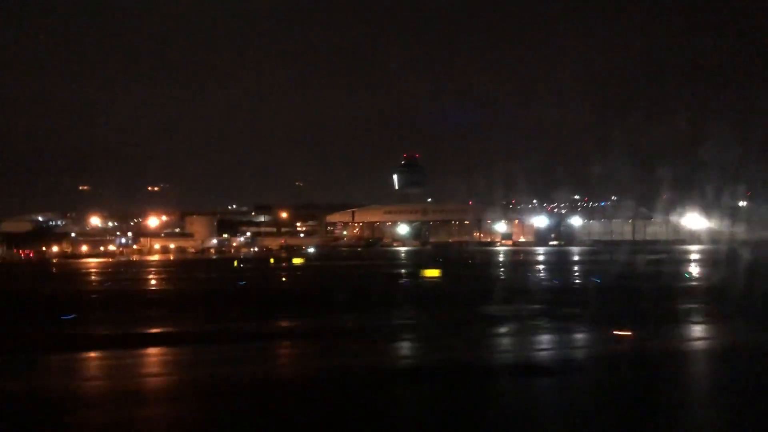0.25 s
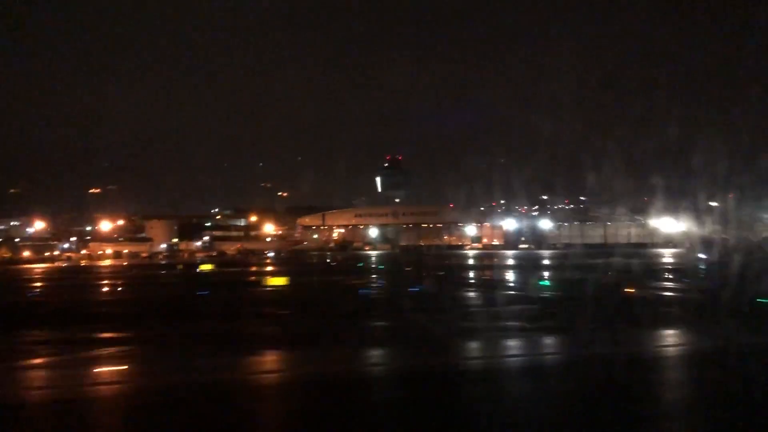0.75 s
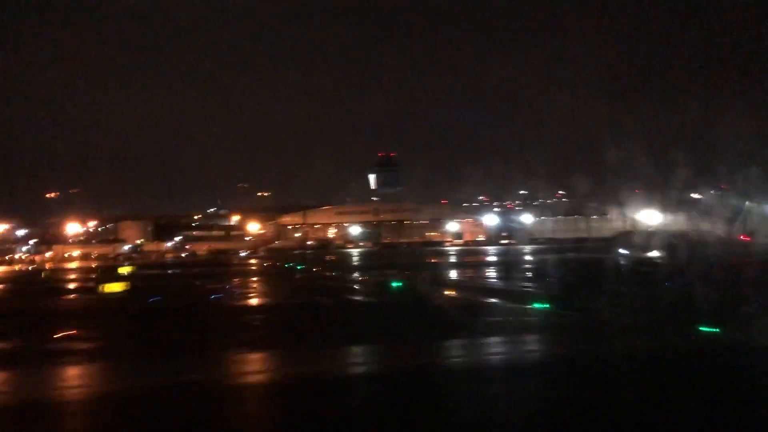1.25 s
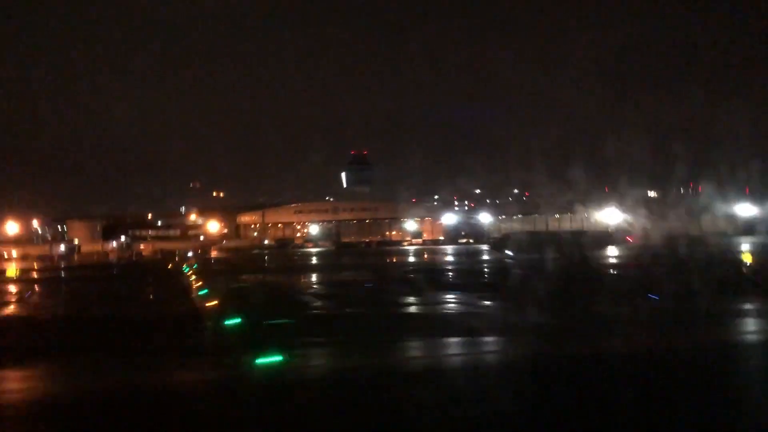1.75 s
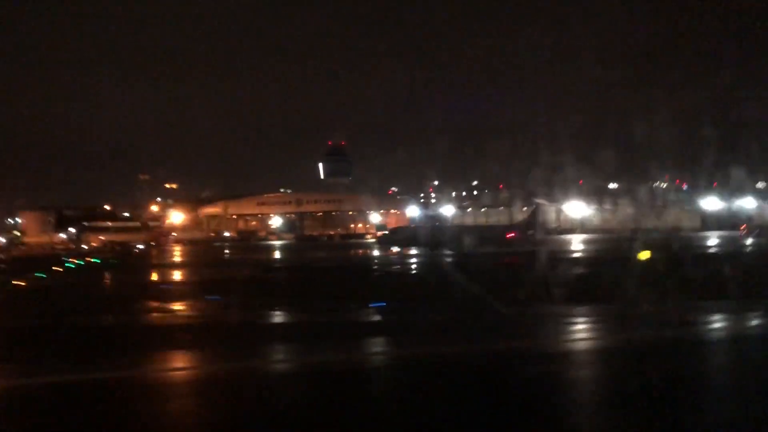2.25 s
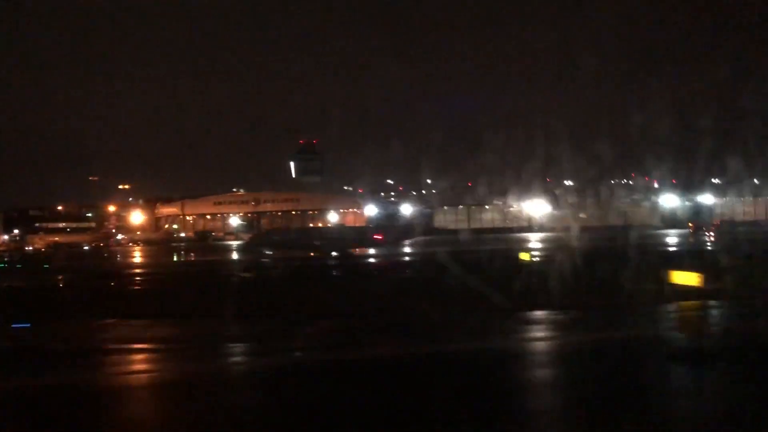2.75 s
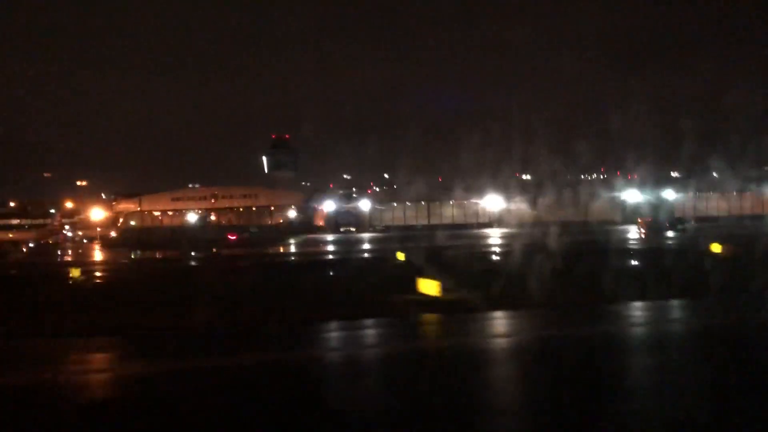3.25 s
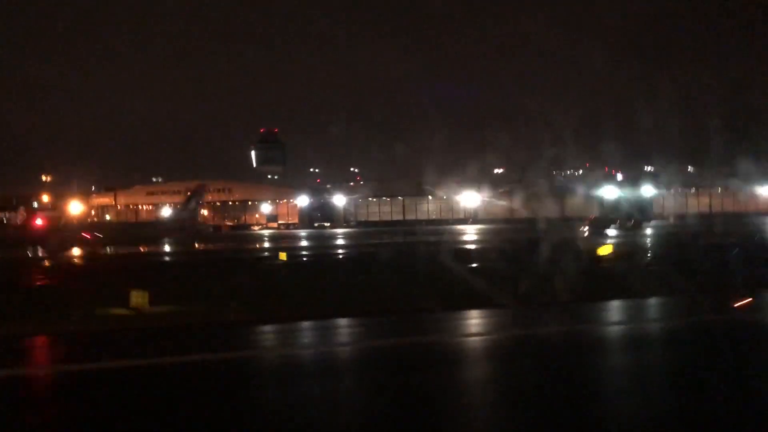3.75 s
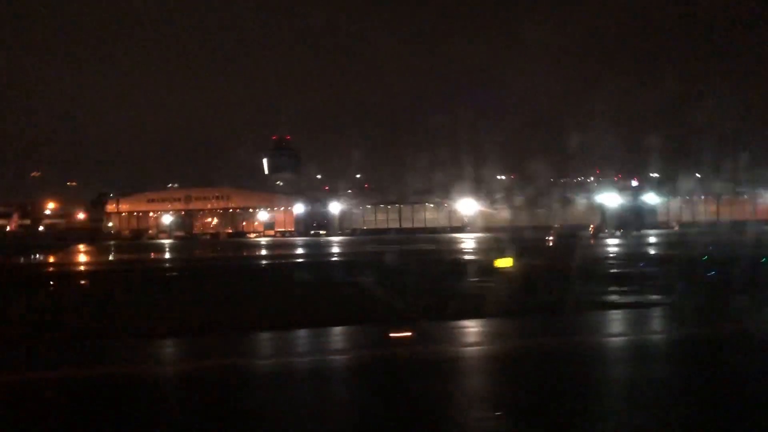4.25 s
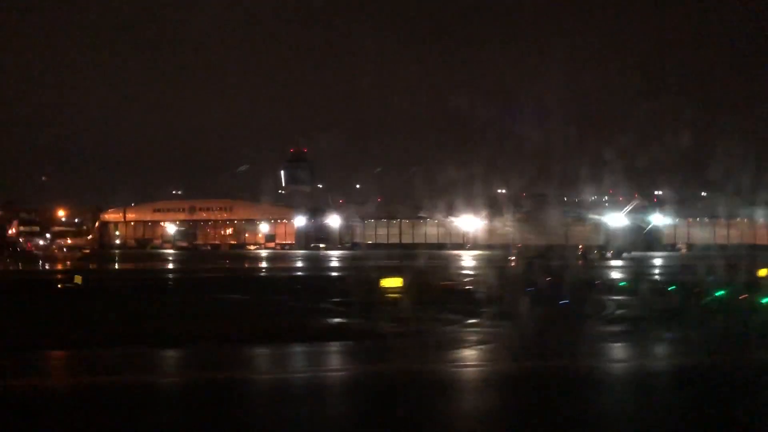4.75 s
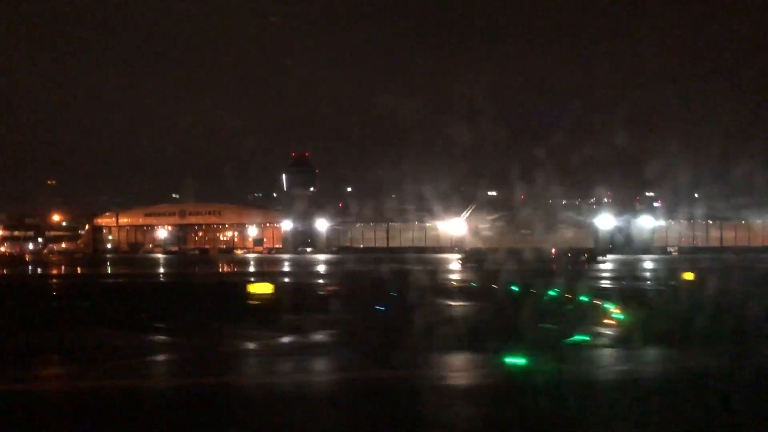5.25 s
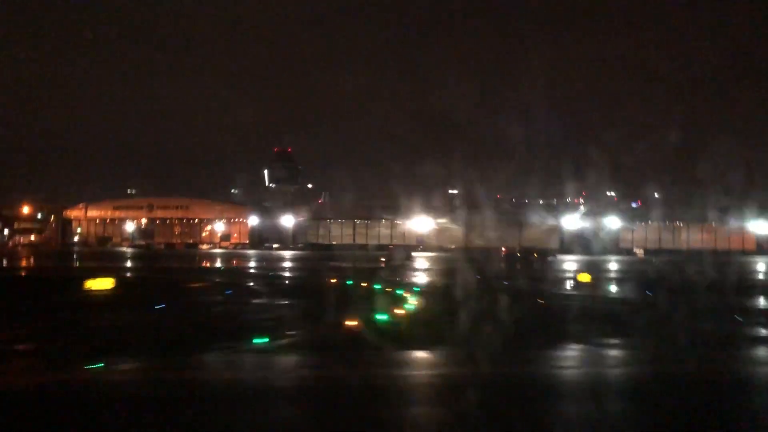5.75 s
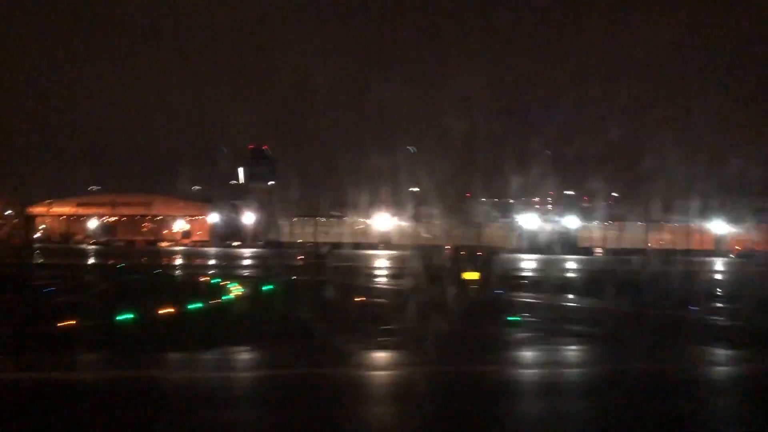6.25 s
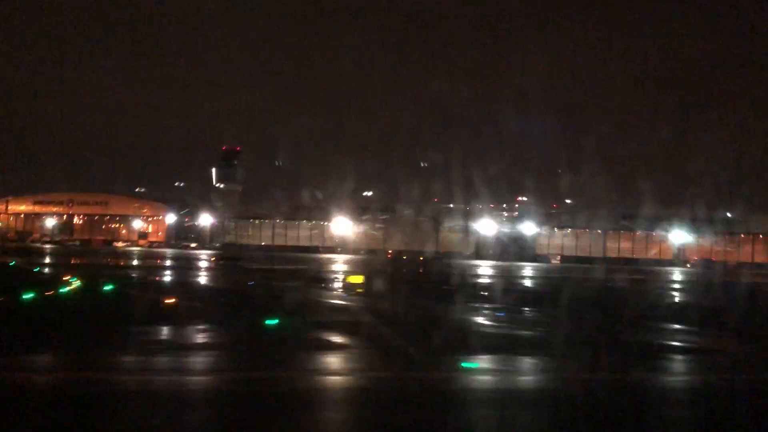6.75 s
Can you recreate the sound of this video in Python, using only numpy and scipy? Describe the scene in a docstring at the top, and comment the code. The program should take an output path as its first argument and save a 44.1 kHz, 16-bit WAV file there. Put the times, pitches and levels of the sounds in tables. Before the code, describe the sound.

Inside an airliner cabin slowing on a wet runway, reverse-thrust roar and deep wheel rumble fade while loose trim rattles and a runway joint thuds.

```python
"""Reverse-thrust roar and wheel rumble die away inside an airliner cabin on its landing roll, on a wet runway.
The fuselage booms unevenly, as a steadier drone around a runway joint, then unevenly again; the joint thuds.
Roar, rumble, panel shudder and air rush are coloured noise on level curves; engine hum and whines are
wavering sines. Loose trim rattles as gritty noise bursts; panel, latch and small parts are struck resonances."""
import sys
import numpy as np
from scipy import signal
from scipy.fft import rfft, irfft, next_fast_len
from scipy.io import wavfile
from scipy.ndimage import uniform_filter1d

SR = 44100
rng = np.random.default_rng(int(sys.argv[2]) if len(sys.argv) > 2 else 0)


def store_wav(level_fs):
    """Save 16-bit WAV to argv[1]."""
    pcm = np.round(np.clip(np.atleast_2d(level_fs), -1, 1) * 32767)
    wavfile.write(sys.argv[1], SR, pcm.T.astype(np.int16))


def magnitude_from_level(level_db):
    """Linear magnitude for a level in decibels (20 dB per decade)."""
    exponent = np.asarray(level_db, float) / 20
    return 10 ** exponent


N = 309141

BUMP_S = 3.2932      # runway joint
CLATTER_S = 0.1      # decay time constant of the shaking at the joint


def rms_one(x):
    """Scale to rms 1."""
    return x / np.sqrt(np.mean(x ** 2) + 1e-20)


def in_time(rows):
    """Columns of a table as curves over all samples."""
    s, *columns = np.transpose(rows)
    return [np.interp(np.arange(N) / SR, s, c) for c in columns]


def drift(corner_hz):
    """Slow chance, spread 1: noise at SR / 40 twice through a one-pole low-pass."""
    r = np.exp(-80 * np.pi * corner_hz / SR)
    noise = rng.standard_normal(N // 40 + 2002)
    slow = signal.lfilter([1], [1, -2 * r, r * r], noise)[2000:]      # settled part
    return np.interp(np.arange(N) / 40, np.arange(len(slow)), rms_one(slow - slow.mean()))


def coloured(spectrum):
    """Noise of rms 1 shaped by a spectrum, interpolated over log frequency."""
    size = next_fast_len(N)
    hz = np.maximum(np.arange(size // 2 + 1) * SR / size, 1)
    points = np.array(spectrum)
    db = np.interp(np.log(hz), np.log(points[:, 0]), points[:, 1], left=-90, right=-90)
    return rms_one(irfft(rfft(rng.standard_normal(size)) * magnitude_from_level(db), size)[:N])


def patchy(spectrum):
    """Coloured noise in third-octave strips; every sixth strip shares one of six independent flickers."""
    flicker_db = 2.2
    whole = rfft(coloured(spectrum))
    octave = np.log2(np.arange(1, N // 2 + 2) * SR / N)
    group = np.round(3 * octave).astype(int) % 6
    return sum(magnitude_from_level(flicker_db * drift(25.0)) * irfft(whole * (group == k), N) for k in range(6))


def ring(clicks, hz, t60_s):
    """Two-pole resonance: a unit click sets a sine of height 1 ringing."""
    r = magnitude_from_level(-60 / (t60_s * SR))
    w = 2 * np.pi * hz / SR
    return signal.lfilter([0, np.sin(w)], [1, -2 * r * np.cos(w), r * r], clicks + 1e-18)


def decaying(clicks, decay_s):
    """Every click becomes an exponential decay with this time constant."""
    return signal.lfilter([1], [1, -np.exp(-1 / (decay_s * SR))], clicks + 1e-18)


def click(s, db):
    """One impulse."""
    x = np.zeros(N)
    x[round(s * SR)] = magnitude_from_level(db)
    return x


def wavering(hz, db, waver_hz, corner_hz, flutter_db):
    """A sine on a pitch and level curve, both trembling."""
    phase = 2 * np.pi * np.cumsum(hz + waver_hz * drift(corner_hz)) / SR
    return np.sqrt(2) * magnitude_from_level(db + flutter_db * drift(corner_hz)) * np.sin(phase)


def ping(s, db, hz, t60_s):
    """A brief gritty push at the mode's pitch sets it ringing."""
    contact_s = 0.0023
    t = np.arange(SR // 50) / SR
    push = rng.exponential(1, len(t)) * np.exp(-t / contact_s)
    contact, i = np.zeros(N), round(s * SR)
    contact[i:i + len(t)] = 2 * magnitude_from_level(db) * push / push.sum() * np.cos(2 * np.pi * hz * t)
    return ring(contact, hz, t60_s)


def roar(roar_db):
    """Reverse-thrust roar: coloured noise, slightly unsteady."""
    # roar spectrum: hz, relative_db_per_hz
    roar_spectrum = [(100, -8.5), (200, 0.5), (300, -2), (450, -5.5), (624, -11.5), (775, -18),
                     (1040, -22.5), (1800, -46), (4000, -49)]
    return magnitude_from_level(roar_db + 0.9 * drift(7.8)) * coloured(roar_spectrum)


def wheels(rumble_db):
    """Wheel rumble through the floor: low coloured noise, slightly unsteady."""
    # rumble spectrum: hz, relative_db_per_hz
    rumble_spectrum = [(24, -34), (36, -22), (48, -7), (80, -4), (130, -3.5), (170, -5.5), (230, -14.5),
                       (400, -46)]
    return magnitude_from_level(rumble_db + 1.0 * drift(4.6)) * coloured(rumble_spectrum)


def boom():
    """Two randomly shaken low cabin modes beat; around the joint a drone prevails, then the beating returns."""
    # fuselage boom level: time_s, level_db
    boom_level = [(0, -34), (.47, -22.5), (.94, -24.5), (1.23, -17.5), (1.7, -23.5), (2.25, -18.5),
                  (2.45, -28), (2.89, -17.5), (3.05, -27.5), (3.12, -15.5), (3.26, -23), (3.31, -12.5),
                  (3.39, -14.5), (3.71, -12), (3.84, -20), (3.9, -16), (4.46, -18.5), (4.53, -21.5),
                  (4.62, -21), (6.3, -23), (7.01, -24)]
    width_hz, evenness = 9.7, 0.56
    drone_hz, sag_hz_per_s = 63.03, 1.74
    rise_s, end_s, fall_s = 0.45, 4.35, 0.4      # rises ahead of the joint, falls after end_s
    t = np.arange(N) / SR
    t60_s = np.log(1000) / (np.pi * width_hz)
    shaken = 0
    for mode_hz in (57.7, 67.94):
        mode = ring(ring(rng.standard_normal(N), mode_hz, t60_s), mode_hz, t60_s)
        swing = np.sqrt(uniform_filter1d(mode ** 2, size=2400))
        shaken = shaken + rms_one(mode / swing ** evenness) / np.sqrt(2)      # evens out the swings
    hz = drone_hz - sag_hz_per_s * np.clip(t - BUMP_S, 0, end_s - BUMP_S)
    phase = 2 * np.pi * np.cumsum(hz + 0.87 * drift(10.8)) / SR
    drone = np.sqrt(2) * np.sin(phase - phase[round(BUMP_S * SR)])      # phase zero at the joint
    rise = 1 + (t - BUMP_S) / rise_s
    fall = 1 - (t - end_s) / fall_s
    share = np.clip(np.minimum(rise, fall), 0.12, 0.93)      # drone's share of the power
    level = magnitude_from_level(in_time(boom_level)[0] + 1.27 * drift(7.0))
    return level * (np.sqrt(share) * drone + np.sqrt(1 - share) * shaken)


def thud():
    """The runway joint strikes a low resonance, then shortly after a higher one; both low-passed."""
    first = ring(click(BUMP_S, -7), 169, 0.049)
    second = ring(click(BUMP_S + 0.0165, -11.5), 266, 0.029)
    return signal.sosfilt(signal.butter(2, 900.0, fs=SR, output="sos"), first + second)


def hum():
    """Engine shaft hum: a sine wavering in pitch and level."""
    # shaft hum: time_s, pitch_hz, level_db
    hum_curve = [(0, 203.1, -36), (1.2, 200.7, -31), (2.4, 199.7, -35.5), (3.5, 207.1, -33.5),
                 (4.6, 199, -34), (4.75, 197.3, -29.5), (5.7, 192, -29.5), (6.2, 193, -36),
                 (7.01, 190.3, -41)]
    return wavering(*in_time(hum_curve), waver_hz=3.5, corner_hz=10.7, flutter_db=3.0)


def rattles():
    """Loose trim: bursts of gritty noise, one longer at the joint, fainter ones and tiny ticks at random."""
    # clearest trim rattles: start_s, treble_level_db, dull_part_relative_db
    rattle_rows = [(0.008, -37, -1), (0.07, -42, -4), (0.5894, -47, -6), (0.877, -46, -11),
                   (0.9094, -49, -9), (1.1035, -43, -9), (1.2994, -49, 6), (1.38, -45, -9), (1.853, -47, 5),
                   (2.677, -47, 2), (2.692, -49, 2), (2.824, -46, 8), (3.0458, -46, -1), (3.127, -50, 9),
                   (3.1542, -49, 9), (3.298, -47, -2), (3.318, -44, -4), (3.3754, -53, 1), (3.392, -59, -2),
                   (3.4755, -52, -13), (3.6836, -48, 8), (3.72, -50, 1), (4.2314, -45, -1),
                   (4.2734, -47.5, 9), (4.452, -46, 7), (4.4654, -52, 8), (4.812, -51, -6),
                   (4.9785, -48, -1), (5.4455, -47, -10), (5.7957, -47, -2), (5.9045, -49, 8),
                   (6.1739, -45, 2), (6.205, -51, 9), (6.4912, -45, 1), (6.6413, -49, -8),
                   (6.792, -47.5, -4), (6.9347, -46, 9.5)]
    decay_s, faint_per_s = 0.011, 3.0
    grit = magnitude_from_level(1.5 * np.minimum(rng.exponential(1, N // 30 + 1), 4)).repeat(30)[:N]
    bright = rms_one(grit * patchy([(4500, -9), (7000, 2.0), (11000, -5.0), (16000, -7)]))
    dull = rms_one(grit * patchy([(550, -6), (800, -1), (1500, 8.0), (1900, 2), (2280, 7.5),
                                  (2900, -0.5), (4200, 5.5), (6500, -12)]))
    bursts = [(*row, decay_s) for row in rattle_rows]
    bursts.append((BUMP_S, -44, 2, CLATTER_S))
    faint_s = np.flatnonzero(rng.random(N // 100) < faint_per_s * 100 / SR) * 100 / SR
    for s in faint_s:
        a, b = rng.standard_normal(2)
        bursts.append((s, -56 + a, -7 + 4.0 * b, decay_s))
    out = np.zeros(N)
    for s, db, dull_db, length_s in bursts:
        i = round(s * SR)
        t = np.arange(min(N - i, SR // 3)) / SR / length_s
        shape = magnitude_from_level(db) * (1 - np.exp(-t * 3.2)) * np.exp(-t)
        out[i:i + len(t)] += shape * (bright[i:i + len(t)] + magnitude_from_level(dull_db) * dull[i:i + len(t)])
    born = rng.random(N) < 25.0 / SR      # 25 ticks a second on average
    ticks = decaying(born * magnitude_from_level(-57.5 + 3.7 * rng.standard_normal(N)), 0.0025)
    return out + ticks * (bright + dull)


def panel():
    """Knocks scuffle on a hollow panel, favouring modes near the struck spot's pitch; the joint scuffles longer."""
    # hollow panel knocks: start_s, strength_db, favoured_pitch_hz
    knock_rows = [(3.305, -48, 1320), (3.316, -44, 1500), (3.345, -42, 890), (3.377, -46, 2230),
                  (3.43, -42, 950), (3.69, -42, 1320), (4.214, -48, 1150), (4.274, -38.5, 1083),
                  (4.305, -44, 1200), (4.328, -38, 1200), (5.479, -44, 1100), (5.867, -46, 1320),
                  (6.111, -41.5, 1250), (6.488, -43.5, 1320)]
    # panel modes: pitch_hz, level_db, t60_s
    panel_modes = [(750, -8, 0.031), (890, -12, 0.022), (1078, -12, 0.027), (1320, -10, 0.021),
                   (1560, -14, 0.018), (2230, -18.5, .018), (2700, -29, 0.018)]
    faint_per_s, off_spot_db_per_octave = 2.5, 18
    faint = (rng.random(N) < faint_per_s / SR) * magnitude_from_level(-52 + 2.0 * rng.standard_normal(N))
    joint = decaying(click(BUMP_S + 0.004, -46.5), CLATTER_S)
    out = 0
    for hz, mode_db, t60_s in panel_modes:
        blows = faint + sum(click(s, db - off_spot_db_per_octave * abs(np.log2(hz / spot_hz)))
                            for s, db, spot_hz in knock_rows)
        scuffle = joint + decaying(blows, 0.0069)
        out = out + magnitude_from_level(mode_db) * ring(scuffle * rng.standard_normal(N), hz, t60_s)
    return out


def pings():
    """Small parts, and one hollow panel knock at the joint, each ringing at one pitch."""
    # small parts and one panel knock (750 Hz): start_s, peak_db, pitch_hz, t60_s
    ping_rows = [(.876, -44, 6400, 0.06), (1.984, -37, 4210, .014), (1.984, -41, 5900, .01),
                 (3.316, -27.5, 750, 0.045), (4.451, -42, 4650, 0.05), (4.460, -44, 4650, .05),
                 (4.472, -39, 2720, .035), (6.175, -48, 4060, .07), (6.182, -46, 4600, .07),
                 (6.198, -41, 4020, .05)]
    return sum(ping(*row) for row in ping_rows)


def latch():
    """One loose metal latch rings all its modes at each blow; weaker blows sound duller."""
    # latch blows: start_s, peak_db (before mode level)
    blows = [(.067, -42), (.078, -41), (1.314, -41.5), (1.610, -42.5), (2.675, -47), (2.692, -51)]
    # latch modes: pitch_hz, relative_db, t60_s
    latch_modes = [(3450, 1.5, 0.065), (3640, -5, .04), (4900, 2, 0.024), (11330, -7, .08)]
    duller = 1.5      # dB per octave lost for each dB below the hardest blow
    hardest_db, lowest_hz = blows[1][1], latch_modes[0][0]
    out = 0
    for s, db in blows:
        tilt_db = duller * max(hardest_db - db, 0)
        for hz, mode_db, t60_s in latch_modes:
            out = out + ping(s, db + mode_db - tilt_db * np.log2(hz / lowest_hz), hz, t60_s)
    return out


def snap():
    """One sharp plastic snap: three close clicks ring high modes, high-passed."""
    # snap modes: pitch_hz, relative_db, t60_s
    snap_modes = [(6620, 3, 0.011), (8900, -2, .006), (10500, -2, 0.005), (11250, -4, .006),
                  (12040, 1, .007), (14100, 5, .005)]
    s, db = 3.5623, -37
    crack = click(s + 0.0004, db - 6) + click(s + 0.0008, db + 2) + click(s + 0.0017, db - 2)
    ringing = sum(magnitude_from_level(mode_db) * ring(crack, hz, t60_s) for hz, mode_db, t60_s in snap_modes)
    return signal.sosfilt(signal.butter(4, 6000, "high", fs=SR, output="sos"), ringing)


def shudder(shudder_db, shake):
    """Panel shudder: mid-range noise jostled by the uneven concrete."""
    # shudder spectrum: hz, relative_db_per_hz
    shudder_spectrum = [(400, -25), (700, -1.5), (1000, 1), (1400, -4.5), (1900, -16.5), (3000, -24.5)]
    return magnitude_from_level(shudder_db + 1.0 * shake) * coloured(shudder_spectrum)


def fittings(shake_db):
    """Many small fittings, each with one pitch, sing briefly when jolted."""
    out = np.zeros(N)
    for hz in np.geomspace(260, 12000, 48) * magnitude_from_level(0.296 * rng.standard_normal(48)):
        jolts = (rng.random(N) < 9.0 / SR) * magnitude_from_level(1.5 * rng.standard_normal(N))
        soft = ring(jolts, hz, 0.017)      # a soft blow: the ring swells before it dies
        out += magnitude_from_level(-8.0 * np.log2(hz / 1000)) * rms_one(ring(soft, hz, 0.13))
    return magnitude_from_level(shake_db - 17) * out


def tones():
    """Noise through narrow resonances, fading in and out and flickering."""
    # passing tones: start_s, end_s, pitch_hz, width_hz, level_db
    tone_rows = [(0, 1.73, 990, 18, -51.5), (4, 5.5, 2735, 18, -70), (2.5, 2.85, 830, 13, -46.5),
                 (5, 5.28, 428, 14, -41), (5, 7.3, 4040, 110, -67.5), (6.5, 6.56, 1695, 9, -60),
                 (6.5, 6.8, 710, 10, -50.5), (4.5, 7.4, 6650, 200, -66), (5, 8, 11980, 700, -71)]
    out, t = np.zeros(N), np.arange(N) / SR
    for start, end, hz, width_hz, db in tone_rows:
        fade = np.clip(np.minimum(t - start, end - t) / (0.11 * (end - start)), 0, 1)
        narrow = ring(rng.standard_normal(N), hz, np.log(1000) / (np.pi * width_hz))
        out += magnitude_from_level(db + 2.1 * drift(2.7)) * fade * rms_one(narrow)
    return out


def rush(rush_db, shake):
    """Air rush: bright noise jostled together with the panels."""
    # air spectrum: hz, relative_db_per_hz
    rush_spectrum = [(1000, -10.5), (1900, 1.5), (2700, -4.5), (3600, -2.5), (5500, -6), (7000, -7.5),
                     (10000, -13), (13000, -19), (16000, -18)]
    return magnitude_from_level(rush_db + 0.91 * shake) * coloured(rush_spectrum)


def whines():
    """Thin whines, probably compressor stages: most sag, one climbs; each flickers and peaks at its own moment."""
    # whines: start_hz, goal_hz, waver_hz, loudest_s, fade_6_db_s, peak_db
    whine_rows = [(15450, 13800, 260, .6, .65, -67), (13070, 7070, 90, .95, .4, -74),
                  (10800, 6730, 110, 1.3, .8, -72), (8580, 6350, 160, 1.6, 1.5, -68),
                  (3360, 7860, 60, 4.95, .4, -72)]
    t = np.arange(N) / SR
    spin = np.exp(-t / 4.0)      # all glide at the same pace
    out = 0
    for start_hz, goal_hz, waver_hz, s, fade_s, peak_db in whine_rows:
        hz = goal_hz + (start_hz - goal_hz) * spin
        db = peak_db - 6 * ((t - s) / fade_s) ** 2 + 1.6 * drift(3.7)
        out = out + wavering(hz, db, waver_hz, corner_hz=152, flutter_db=0.0)
    return out


def scene():
    """All sources reach one microphone by the window."""
    # slowing down: time_s, wheel_rumble_db, thrust_roar_db, panel_shudder_db, air_rush_db
    roll = [(0, -15, -18.5, -36, -45), (1.46, -23, -27.5, -45.5, -50), (1.89, -20, -27.5, -46, -52.5),
            (2.5, -27.5, -31, -49, -55), (3.01, -25, -36, -45.5, -51.5), (4.59, -26.5, -35, -43, -52),
            (5.39, -28, -40, -48, -52), (7.01, -28, -39.5, -45.5, -51)]
    rumble_db, roar_db, shudder_db, rush_db = in_time(roll)
    shake = drift(6.7)      # uneven concrete jostles panels and air together
    ride = roar(roar_db) + wheels(rumble_db) + boom() + thud()
    trim = rattles() + panel() + pings() + latch() + snap() + fittings(shudder_db)
    noise = shudder(shudder_db, shake) + rush(rush_db, shake)
    return (ride + hum() + trim + noise + tones() + whines())[None]


def low_pass(x):
    """Removes everything above the highest recorded frequency."""
    return signal.sosfilt(signal.butter(12, 16180, fs=SR, output="sos"), x)


def record(dry):
    """The microphone loses the deepest bass, peaks are gently rounded, the top is cut."""
    heard = signal.sosfilt(signal.butter(4, 36.0, "high", fs=SR, output="sos"), dry)
    rounded = 0.9 * np.tanh(heard / 0.9)
    mix = signal.sosfilt(signal.ellip(12, 0.3, 50, 15730, fs=SR, output="sos"), rounded)
    return low_pass(mix)


dry = scene()
out = record(dry)
store_wav(out)
```